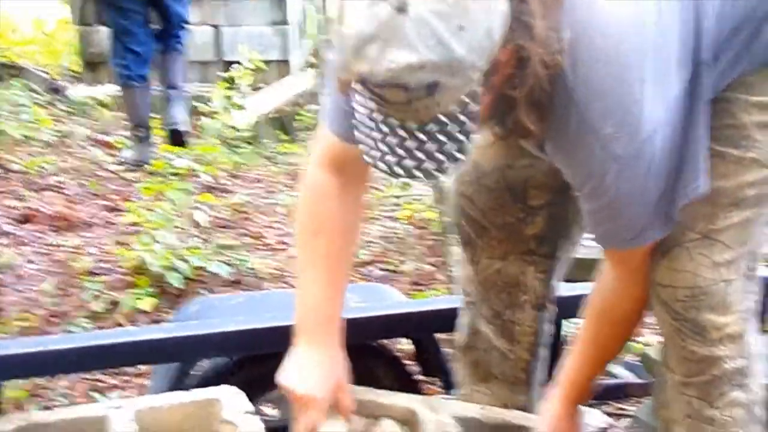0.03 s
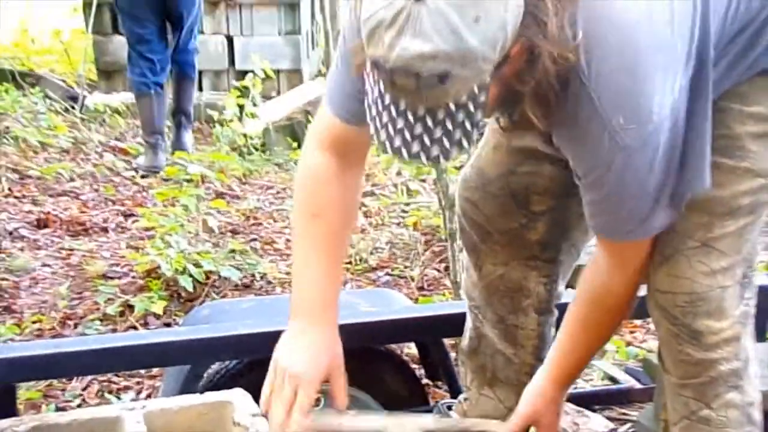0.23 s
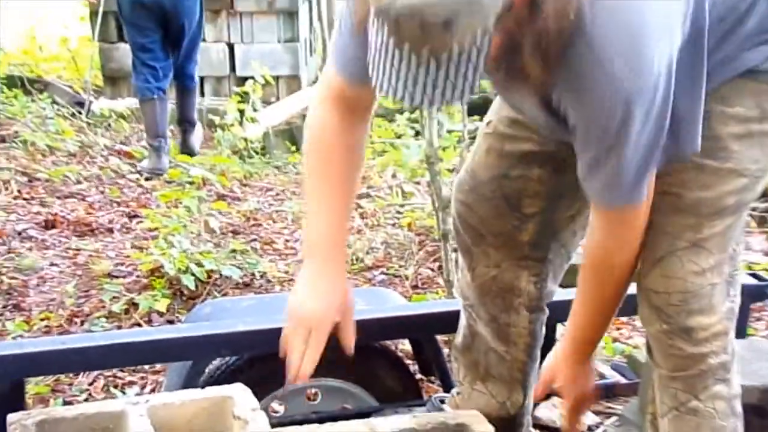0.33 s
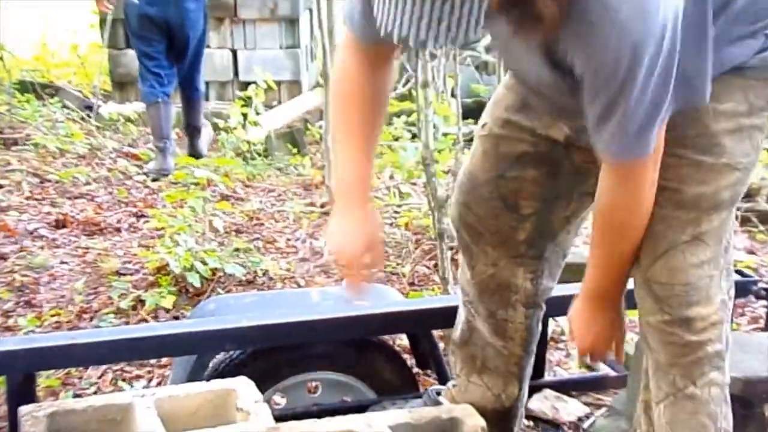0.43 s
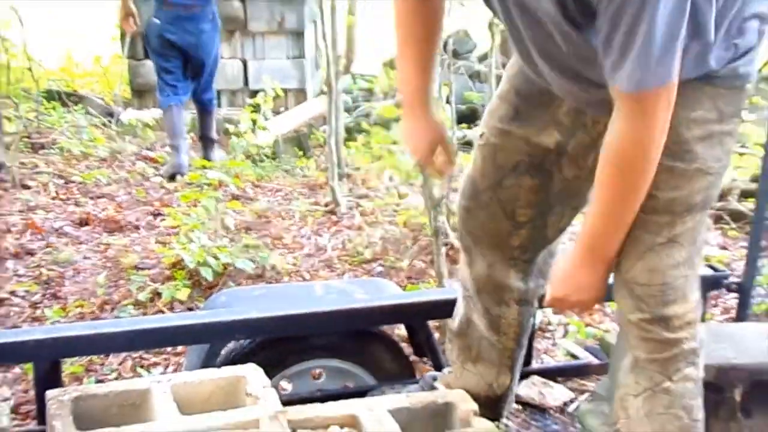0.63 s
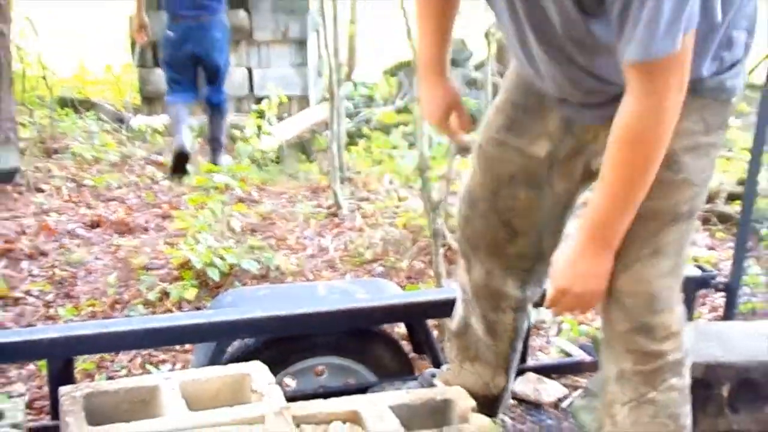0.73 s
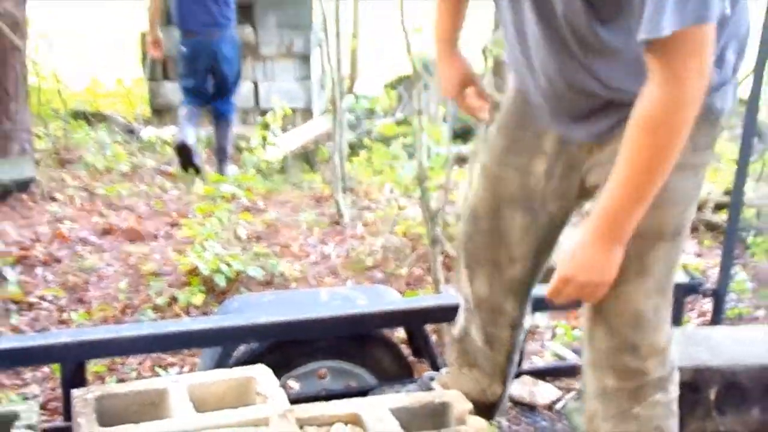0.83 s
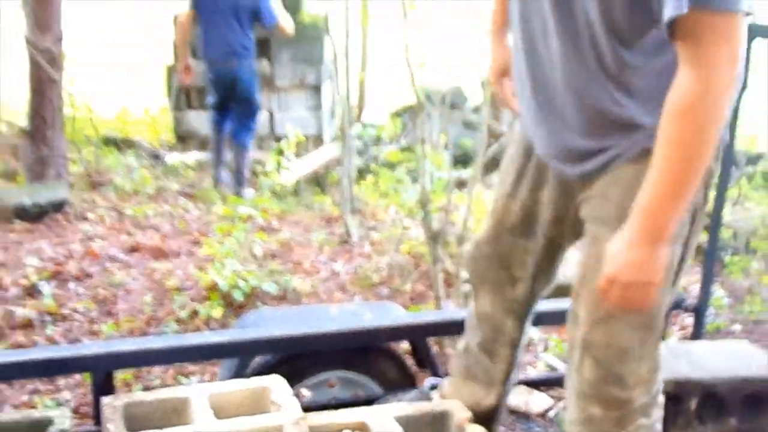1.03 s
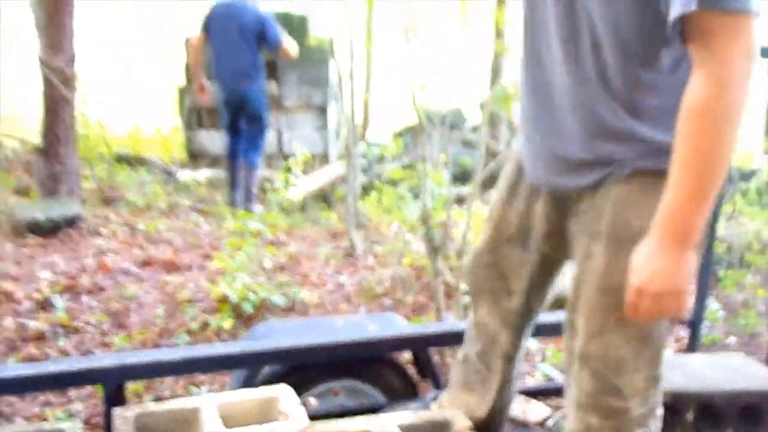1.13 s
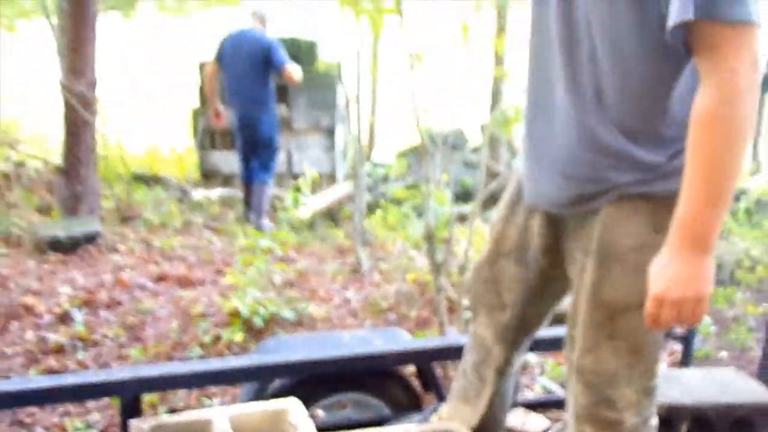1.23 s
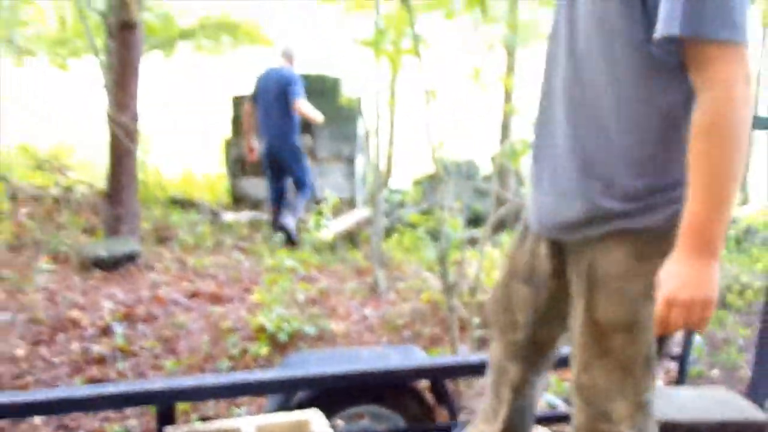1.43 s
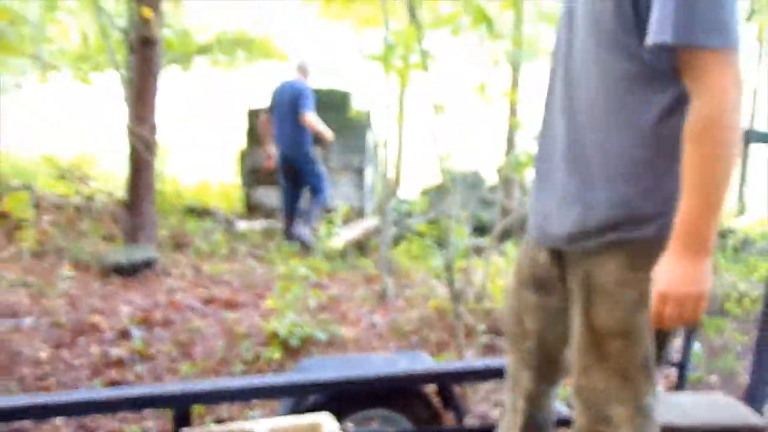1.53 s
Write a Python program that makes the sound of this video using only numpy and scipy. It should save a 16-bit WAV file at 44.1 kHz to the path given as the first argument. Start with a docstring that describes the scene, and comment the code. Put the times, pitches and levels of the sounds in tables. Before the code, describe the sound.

One dull, gritty thud of a concrete block set down on a stack, then faint scuffs.

```python
"""A heavy concrete block is set down on other blocks on a steel trailer in a quiet, rumbling yard.
It slides, knocks hollowly with one edge, then scrapes as sand grains snap under it.
Its weight lands with a thud and a crunch of grit; the stack and the steel ring on.
A dull, rough wash lingers, then drops away quickly. Light scuffs follow and a loose piece taps.
A far insect trills and a few soft steps pass, until only the insect and the yard are left."""
import sys
import numpy as np
from scipy import signal
from scipy.fft import rfft, irfft
from scipy.io import wavfile

SR = 44100
rng = np.random.default_rng(int(sys.argv[2]) if len(sys.argv) > 2 else 0)


def to_wav(sig):
    """Store sig (one row per channel, or 1-D mono) as 16-bit WAV at the path in sys.argv[1].

    Samples outside -1..1 are clipped; the rate is SR.
    """
    pcm = np.clip(np.atleast_2d(sig), -1, 1) * 32767
    pcm = np.round(pcm).astype(np.int16)
    wavfile.write(sys.argv[1], SR, pcm.T)  # frames by channels


N = 70560
T = np.arange(N) / SR

# A "fade" or "t60" is the time a sound takes to drop by 60 dB. A "tone" sets the balance of low and high.
# the block's weight lands: (time [s], level [dB], push length [s])
LANDING_BLOWS = [(0.2768, -7, .0026), (0.2818, -11.5, 0.0011)]
# the stack's dull thump: (frequency [Hz], relative level [dB])
THUD_TONE = [(30, -35), (90, -14.5), (170, 1), (280, -1.5), (430, -4.5), (800, -1.5), (1300, -12),
             (3000, -33.5)]
# one edge touches down first: (time [s], level [dB])
EDGE_KNOCKS = [(0.129, -20), (.150, -31.5)]
# the hollow notes of that knock: (frequency [Hz], relative level [dB], fade [s])
KNOCK_NOTES = [(415, 0, .028), (775, -19, .11), (1085, -17, .08)]
# the notes of the hollow block when rubbed: (frequency [Hz], relative level [dB], fade [s])
BLOCK_NOTES = [(785, -1, .15), (845, 2, .1), (1020, -7, .12), (1225, -4, .18), (1409, -1, .18),
               (1599, -3, .18), (1856, -1, .18), (2017, 1, .16), (2300, 1, .2), (2400, -1, .16),
               (2954, 0, .2), (3181, -1, .2), (3360, 2, .1), (3866, 1, .18), (4087, 2, .18)]
# the notes of the trailer's steel: (frequency [Hz], relative level [dB], fade [s])
TRAILER_NOTES = [(196, -14, .68), (275, -32, .6), (612, -19, .5), (778, -28, .6)]

# Each kind of rubbing has two tables.
# STROKES: (time [s], level [dB], rise [s], hold [s], fade [s])
# TONE: (frequency [Hz], relative level [dB])
# grit is crushed as the block lands and settles
CRUNCH_STROKES = [(.2765, -16.5, 0.00053, 0.015, .05), (.281, -12.5, .002, 0.021, 0.27),
                  (.366, -27, 0.0035, 0.055, 0.2), (.448, -31.5, .004, 0.0053, 0.035)]
CRUNCH_TONE = [(30, -43.5), (60, -27), (170, -4), (450, -2.5), (850, 0), (1200, 0.5), (2000, 1), (3200, 0),
               (4200, -9.5), (5500, -17.5), (7000, -24), (9300, -23), (11000, -34.5), (15500, -35.5)]
# concrete rubs on concrete
SCRAPE_STROKES = [(-.004, -48, .004, .02, .25), (.082, -55, .003, 0.002, .06),
                  (.132, -50.5, .004, .025, .2), (.166, -37.5, .004, .012, 0.18),
                  (.216, -31, .003, .006, .1), (.222, -28.5, .006, .012, .15),
                  (.263, -30.5, .002, .004, .06)]
SCRAPE_TONE = [(40, -33.5), (80, -25), (200, -1), (550, -6.5), (800, -14), (1100, -3), (1600, -4.5),
               (2350, 2.5), (3300, -4.5), (4300, -11.5), (6500, -22.5), (9500, -24.5), (15500, -37)]
# the block grinds on its edge; after the landing a dull, rough wash lingers, then drops away quickly
DULL_STROKES = [(.138, -42, .012, 0.011, .1), (.47, -44.5, 0.008, 0.029, .15),
                (.522, -46, 0.01, 0.026, 0.064)]
DULL_TONE = [(300, -4.5), (800, -15), (1080, 4), (1350, 0), (1750, 6), (2500, -6.5), (3400, -13.5),
             (5000, -33), (12000, -43)]
# light gritty scuffs; these strokes end in one more column (pitch factor [ratio])
SCUFF_STROKES = [(0.606, -46, 0.0065, 0.019, 0.11, 0.94), (0.652, -56.5, 0.0031, 0.029, 0.087, 0.82),
                 (0.996, -52, 0.0042, 0.039, 0.17, 1.02), (1.071, -45, .003, 0.0098, 0.043, 0.97),
                 (1.083, -49, 0.0052, 0.014, 0.13, 0.89)]
SCUFF_TONE = [(600, -25), (1200, -21), (1600, -2.5), (2300, 7.5), (3100, 0.5), (4000, -12), (5000, -8.5),
              (6300, -27), (9500, -33), (15500, -35)]
# crisp ticks of grit
TICK_STROKES = [(.052, -52.5, .002, 0.0017, 0.011), (.084, -55, 0.0035, 0.0035, .03),
                (.994, -50, 0.0038, 0.0033, 0.084), (1.075, -56, .002, 0.0036, .05)]
TICK_TONE = [(1000, -25), (2500, 3), (5000, 3), (6500, -14.5), (9500, -7), (15500, -23)]
# soft footfalls on the trailer bed
STEP_STROKES = [(.066, -58, 0.0032, 0.0069, 0.08), (1.03, -54, 0.0073, 0.007, 0.2),
                (1.095, -60, 0.0017, 0.021, .5)]
STEP_TONE = [(50, -15.5), (130, -5.5), (330, -2.5), (600, -0.5), (900, -13), (2000, -34)]

# a small loose piece taps: (time [s], level [dB])
LOOSE_TAPS = [(.721, -47.5), (.778, -65), (0.838, -60)]
# the lingering sound of load and yard: (frequency [Hz], relative level [dB], fade [s])
TAIL_BANDS = [(70, -10.5, 0.38), (180, -10.5, 1.4), (453, -10.5, 1.29), (750, -14.5, 0.39),
              (1200, -9, 0.32), (2200, -8, 0.2), (4500, -18, 0.29), (10000, -21, 0.19)]
# an insect trills far off: (start [s], end [s])
INSECT_TRILLS = [(.71, .9), (1.13, 1.31), (1.56, 1.62)]
# the yard's rumble and hiss: (frequency [Hz], relative level [dB])
YARD_TONE = [(25, 2.5), (60, -3.5), (130, 2.5), (250, -1), (450, -5.5), (750, -16.5), (1200, -28.5),
             (2300, -23.5), (4000, -27), (7000, -29), (10000, -21.5), (15500, -24.5)]
# narrow dips in the microphone's tone: (frequency [Hz], width [Hz])
MIC_NOTCHES = [(3680, 100), (4380, 130), (7620, 120), (8040, 520), (11750, 600)]

RATTLE_DB, RATTLE_T60_S = -3.5, .17
KNOCK_CONTACT_S, KNOCK_LOW_CUT_HZ = .00055, 250
GRAINS_PER_S, GRAIN_SPREAD_DB, JUDDER_DB, JUDDER_PER_S = 12000, 2.0, 1.0, 200
TRAILER_SWELL_S, TAIL_BUILD_S = .25, .013
INSECT_HZ, INSECT_SAG_HZ, INSECT_PULSES_PER_S = 5530, 120, 26
INSECT_DB, INSECT_UNEVEN_DB, YARD_DB = -77.5, 3.5, -61
MIC_LOW_CUT_HZ, MIC_HIGH_CUT_HZ = 68, 15900


def landing_force():
    """Each blow is one push and rebound of the block's weight."""
    return sum(from_db(db) * np.sin(2 * np.pi * ramp(start, length))
               for start, db, length in LANDING_BLOWS)


def thud(force):
    """The stack answers the landing with a dull thump and a short rattle."""
    body = tone_filter(THUD_TONE)
    thump = through(force, body / np.abs(rfft(body)).max())
    rattle = rms_one(rng.standard_normal(N) * dying(RATTLE_T60_S)) / np.sqrt(N)
    return thump + from_db(RATTLE_DB) * through(thump, rattle)


def knocks():
    """A blunt touch rings the block's lowest notes; so small a body gives no deep bass."""
    force = sum(from_db(db) * np.sin(np.pi * ramp(start, KNOCK_CONTACT_S)) for start, db in EDGE_KNOCKS)
    pulse_area = 2 * KNOCK_CONTACT_S * SR / np.pi
    ring = sum((-1) ** k * from_db(db) * note(hz, t60) for k, (hz, db, t60) in enumerate(KNOCK_NOTES))
    return low_cut(through(force / pulse_area, ring), KNOCK_LOW_CUT_HZ)


def rubbing(strokes, tone):
    """Sand grains snap in shaky showers that rise, hold and fade with each stroke."""
    sizes = from_db(GRAIN_SPREAD_DB * np.minimum(rng.exponential(1, N), 4))
    signs = rng.choice([-1, 1], N)
    snaps = rng.random(N) < GRAINS_PER_S / SR
    judder = from_db(JUDDER_DB * drift(JUDDER_PER_S))
    grains = rms_one(sizes * signs * snaps * judder)
    power = 0
    for start, db, rise, hold, t60 in strokes:
        fall_db = 60 * np.maximum(T - start - rise - hold, 0) / t60
        power += (ramp(start, rise) * from_db(db - fall_db)) ** 2
    return through(grains * np.sqrt(power), tone_filter(tone))


def hollow_block(rub):
    """The hollow block adds its own ringing notes to whatever rubs it."""
    ring_db = 4.5
    ring = sum((-1) ** k * from_db(db + ring_db) * note(hz, t60) * 2 / dying(t60).sum()
               for k, (hz, db, t60) in enumerate(BLOCK_NOTES))
    return rub + through(rub, ring)


def trailer(force):
    """The steel frame's low ring swells up after the landing."""
    steel = sum(from_db(db) * note(hz, t60) for hz, db, t60 in TRAILER_NOTES)
    swell = 1 - np.exp(-T / TRAILER_SWELL_S)
    push = np.abs(force)
    return through(push / push.sum(), steel * swell)


def scuffs():
    """Light rubs on grit, each with the same tone moved to its own pitch."""
    return sum(rubbing([stroke], [(hz * pitch, db) for hz, db in SCUFF_TONE])
               for *stroke, pitch in SCUFF_STROKES)


def taps():
    """A loose piece rings with one short note at each soft touch."""
    touches = sum(from_db(db) * (np.arange(N) == int(start * SR)) for start, db in LOOSE_TAPS)
    return through(touches, note(hz=1042, t60=.067))


def lingering(sound):
    """Load and yard leave a wash of sound that builds and dies band by band; the low mids last longest."""
    edges_hz = np.geomspace(45, 17000, 15)
    noise = rng.standard_normal((2, N))
    build = 1 - np.exp(-T / TAIL_BUILD_S)
    tail = 0
    for k, (low, high) in enumerate(zip(edges_hz, edges_hz[1:])):
        hz = np.sqrt(low * high)
        shape = rms_one(dying(at_hz(TAIL_BANDS, hz, column=2)) * build) / np.sqrt(N)
        band = signal.sosfilt(signal.butter(2, [low, high], "band", fs=SR, output="sos"), noise[k % 2])
        tail += from_db(at_hz(TAIL_BANDS, hz)) * shape * band
    return through(sound, tail)


def insect():
    """A far insect sings runs of soft, uneven pulses, each sagging in pitch."""
    cycle = (T * INSECT_PULSES_PER_S) % 1
    singing = sum((T > start) & (T < end) for start, end in INSECT_TRILLS)
    pulses = singing * np.sin(np.pi * cycle) ** 2
    hz = INSECT_HZ - INSECT_SAG_HZ * (cycle - .5 + .5 * drift(150))
    loudness = from_db(INSECT_DB + INSECT_UNEVEN_DB * drift(20))
    return loudness * pulses * np.sin(2 * np.pi * np.cumsum(hz) / SR)


def yard():
    """Steady noise, shaped into a distant rumble and a faint hiss."""
    return from_db(YARD_DB) * irfft(rfft(rng.standard_normal(N)) * rfft(tone_filter(YARD_TONE)))


def from_db(db):
    """Turn decibels into a multiplier."""
    return 10 ** (np.asarray(db) / 20)


def rms_one(x):
    """Scale a signal so its average power is 1."""
    return x / np.sqrt(np.mean(x ** 2) + 1e-20)


def at_hz(table, hz, column=1):
    """Read between a table's rows, with octaves evenly spaced."""
    rows = np.array(table)
    return np.interp(np.log(np.maximum(hz, 1)), np.log(rows[:, 0]), rows[:, column])


def through(x, response):
    """Play a signal through an object, given that object's response to one click."""
    return signal.fftconvolve(x, response)[:N]


def tone_filter(tone):
    """Build a click response with the given tone and an energy of 1."""
    gains = from_db(at_hz(tone, np.arange(N // 2 + 1) * SR / N))
    cepstrum = irfft(np.log(gains))
    # folding the second half onto the first keeps any sound from coming before the click
    cepstrum[1:N // 2] *= 2
    cepstrum[N // 2 + 1:] = 0
    return rms_one(irfft(np.exp(rfft(cepstrum)))) / np.sqrt(N)


def low_cut(x, hz):
    """Turn down everything below hz."""
    return signal.sosfilt(signal.butter(2, hz, "high", fs=SR, output="sos"), x)


def ramp(start, length):
    """Climb from 0 to 1, then stay there."""
    return np.clip((T - start) / length, 0, 1)


def dying(t60):
    """Fade from 1, losing 60 dB every t60 seconds."""
    return from_db(-60 * T / max(t60, .002))


def note(hz, t60):
    """One pure note that dies away."""
    return np.sin(2 * np.pi * hz * T) * dying(t60)


def drift(per_second):
    """A random wander with a typical size of 1."""
    return rms_one(np.interp(T * per_second, np.arange(N), rng.standard_normal(N)))


def scene():
    """Mix the block, the trailer, the small sounds, their tail, the yard and the insect."""
    force = landing_force()
    landing = knocks() + thud(force)
    landing += hollow_block(rubbing(SCRAPE_STROKES, SCRAPE_TONE) + rubbing(CRUNCH_STROKES, CRUNCH_TONE))
    small = hollow_block(rubbing(DULL_STROKES, DULL_TONE)) + scuffs()
    small += rubbing(TICK_STROKES, TICK_TONE) + rubbing(STEP_STROKES, STEP_TONE) + taps()
    tail = lingering(landing + from_db(-12.5) * small)
    return (landing + trailer(force) + small + tail + yard() + insect())[None]


def record(dry):
    """The microphone is thin in the bass and has narrow dips; peaks are rounded and the top is cut."""
    sound = low_cut(dry, MIC_LOW_CUT_HZ)
    for hz, width in MIC_NOTCHES:
        sound = signal.lfilter(*signal.iirnotch(hz, hz / width, fs=SR), sound)
    rounded = 1.1 * np.tanh(sound / 1.1)
    return signal.sosfilt(signal.ellip(12, .1, 80, MIC_HIGH_CUT_HZ, fs=SR, output="sos"), rounded)


dry = scene()
out = record(dry)
to_wav(out)
```